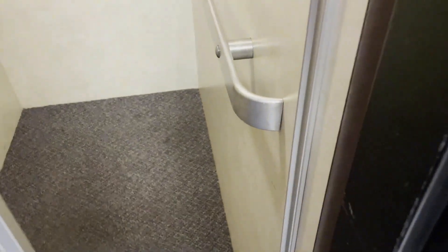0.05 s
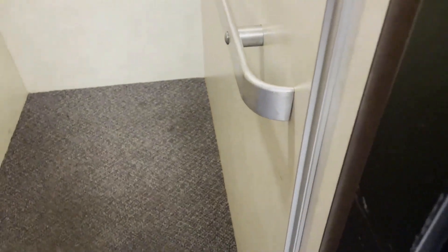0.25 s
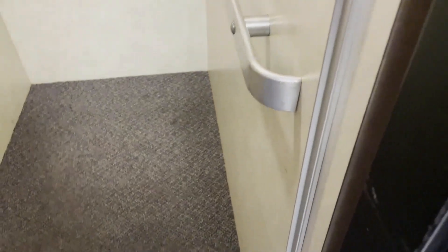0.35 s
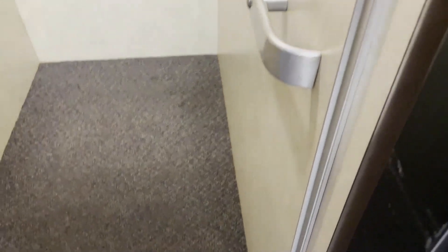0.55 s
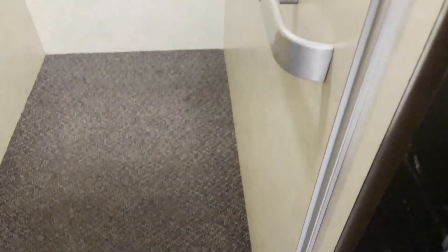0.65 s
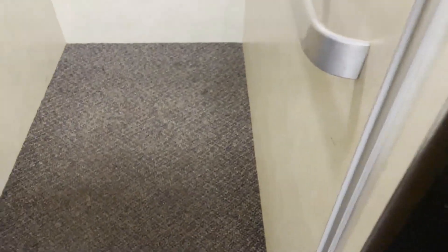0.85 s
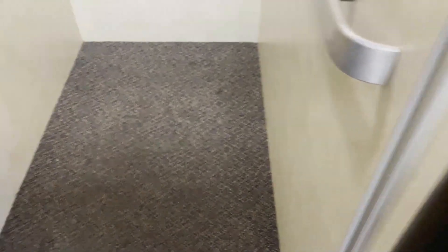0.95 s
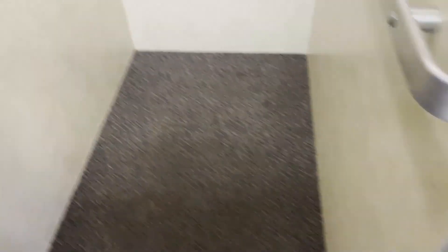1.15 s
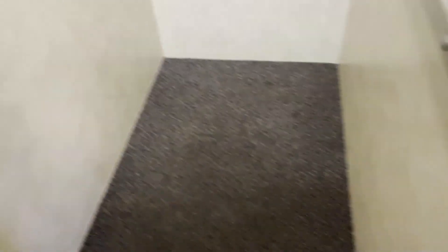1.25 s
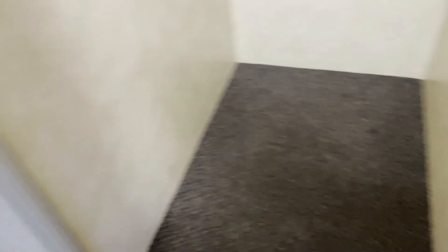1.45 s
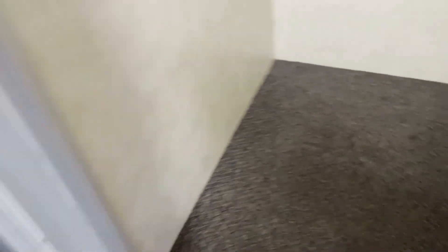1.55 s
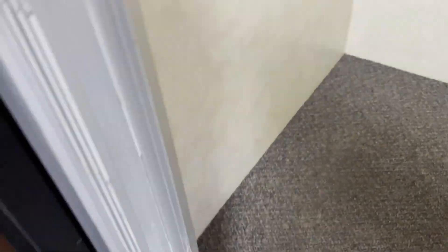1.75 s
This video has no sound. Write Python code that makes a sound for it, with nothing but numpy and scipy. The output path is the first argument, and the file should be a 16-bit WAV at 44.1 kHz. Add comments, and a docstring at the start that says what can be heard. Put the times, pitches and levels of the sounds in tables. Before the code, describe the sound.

A metal lift door slides open close by, scraping and squealing, then bangs against its stop and rattles. Someone steps into the small carpeted car with soft thuds, shoe scuffs and metallic ticks over a low machinery rumble.

```python
"""Lift machinery rumbles and hums throughout. Close by, a metal door slides open, scraping
its track while the rollers sing at a pitch that follows its speed. At 0.5 s it strikes its
stop and rattles: the edge cracks, the sheet clashes, the panel rings and the floor thuds.
From 0.9 s someone steps into the small carpeted car: soft footfalls, ticks from the metal
sill, shoe scuffs and hollow knocks from the car's panels."""
import sys
import numpy as np
from scipy import signal
from scipy.fft import rfft, irfft
from scipy.io import wavfile

SR = 44100
rng = np.random.default_rng(int(sys.argv[2]) if len(sys.argv) > 2 else 0)


def store_pcm(level_fs):
    """Save levels as 16-bit WAV."""
    pcm = np.round(np.clip(level_fs, -1, 1) * 32767).astype(np.int16)
    wavfile.write(sys.argv[1], SR, np.atleast_2d(pcm).T)


N = 79380
T = np.arange(N) / SR
HZ = np.fft.rfftfreq(N, 1 / SR)


def amp(db):
    """Decibels to gain."""
    return 10 ** (np.asarray(db) / 20)


def unit(x):
    """Scales to rms 1."""
    return x / np.sqrt(np.mean(x ** 2) + 1e-20)


def at_hz(table, hz):
    """Interpolates a table on a log-frequency axis."""
    freqs, values = np.transpose(table)
    return np.interp(np.log(hz + 1), np.log(freqs + 1), values)


def curve(table, column=1):
    """Interpolates one column of a table over time."""
    rows = np.array(table)
    return np.interp(T, rows[:, 0], rows[:, column])


def drift(rate_hz):
    """Random wander of rms 1."""
    return unit(irfft(rfft(rng.standard_normal(N)) * np.exp(-(HZ / rate_hz) ** 2), N))


def struck(start_s, rise_s, t60_s):
    """Envelope of a blow: linear rise, exponential fall."""
    age = np.maximum(T - start_s, 0)
    return np.minimum(age / rise_s, 1) * np.exp(-np.log(1000) * age / t60_s)


def resonate(x, hz, width_hz):
    """A resonance that follows the curve hz."""
    carrier = np.exp(2j * np.pi * np.cumsum(hz) / SR)
    pole = np.exp(-np.pi * width_hz / SR)
    return 2 * (carrier * signal.lfilter([1 - pole], [1, -pole], x * carrier.conj())).real


# Microphone pair (frequency [Hz], coherence [0..1])
COHERENCE = [(150, 1), (300, 1), (600, 0.18), (1400, 0.56), (3000, 0.48), (5000, 0.13), (9000, 0.81),
             (13000, 0.99)]
def noise(gain):
    """Stereo noise of rms 1, shaped by gain, alike on both sides in the bass."""
    a, b = rfft(rng.standard_normal((2, N)))
    coherence = at_hz(COHERENCE, HZ)
    mid, side = a * np.sqrt(1 + coherence), b * np.sqrt(1 - coherence)
    return unit(irfft(np.array([mid + side, mid - side]) * gain, N))


def coloured(spectrum):
    """Stereo noise with a tabulated spectrum."""
    return noise(amp(at_hz(spectrum, HZ)))


def tone(hz):
    """Stereo sine of rms 1; lower coherence sets the two phases further apart."""
    spread = np.arccos(at_hz(COHERENCE, np.mean(hz))) * rng.choice([-1, 1])
    phase = 2 * np.pi * (np.cumsum(hz * np.ones(N)) / SR + rng.random())
    return np.sqrt(2) * np.sin(phase + spread * np.array([[.5], [-.5]]))


# Reverberation (frequency [Hz], t60 [s])
LANDING_DECAY = [(150, 0.88), (400, 0.71), (3000, 0.73), (6000, 0.51), (12000, 0.46), (14500, 0.17)]
def landing(x):
    """The hard-walled landing rings on, the treble dying first."""
    hz, t, frames = signal.stft(noise(1), SR, nperseg=256)
    decay = np.exp(-np.log(1000) * t / at_hz(LANDING_DECAY, hz)[:, None])
    tail = signal.istft(frames * decay, SR, nperseg=256)[1][:, :N]
    tail *= np.minimum(T / 0.0039, 1)
    return signal.fftconvolve(x, tail / np.linalg.norm(tail[0]), axes=1)[:, :N]


# Rumble of door and machinery (time [s], level [dB])
RUMBLE_LEVEL = [(0, -36), (.25, -32.5), (.47, -30), (.75, -32.5), (.9, -37), (1.1, -39.5), (1.23, -36.5),
                (1.4, -40), (1.58, -48), (1.72, -40), (1.8, -42.5)]
# Rumble, air noise and hum partials (frequency [Hz], level [dB])
RUMBLE_SPECTRUM = [(15, -40), (30, -19), (43, 3.5), (65, 2.5), (90, 2.5), (120, 2.5), (150, -5), (260, -6),
                   (340, -5), (430, -9.5), (560, -19), (1000, -18), (2000, -26.5), (6000, -55)]
AIR_SPECTRUM = [(100, 25.5), (900, -22), (2000, 6.5), (5000, 4), (7000, -3), (11500, -4), (14000, -32)]
HUM_PARTIALS = [(54, -45), (119, -45), (180, -47.5), (209, -52)]
def machinery(air_db=-57.5, waver_hz=2.466, flutter_db=4):
    """Low rumble, faint air noise and a hum that wavers in pitch and level."""
    out = coloured(RUMBLE_SPECTRUM) * amp(curve(RUMBLE_LEVEL)) + amp(air_db) * coloured(AIR_SPECTRUM)
    for hz, db in HUM_PARTIALS:
        cycles = np.cumsum(hz + waver_hz * drift(rate_hz=6.85)) / SR + rng.random()
        flutter = amp(flutter_db * drift(rate_hz=8.3))
        out += amp(db) * unit(np.sin(2 * np.pi * cycles) * flutter)
    return out


# Scuffs (peak time [s], rise [s], fall [s], level [dB], centre [Hz], glide [octaves/s])
SHOE_SCUFFS = [(0.974, 0.034, 0.019, -41, 3670, -6), (1.024, 0.011, 0.018, -46.5, 2780, -22),
               (1.227, 0.076, 0.053, -39, 1570, -11.5), (1.315, 0.033, 0.12, -43, 1060, -9),
               (1.686, 0.023, 0.046, -47.5, 1670, -37)]
# Sole friction (frequency [Hz], level [dB])
SCUFF_SPECTRUM = [(100, 13), (1000, 5), (5000, 0.5), (7000, -7.5), (11000, -5.5), (13500, -14)]
def scuffs(width_hz=2900):
    """Soles brush the floor: a broad resonance glides down as each scuff swells and fades."""
    out = np.zeros((2, N))
    for peak_s, rise_s, fall_s, db, hz, glide in SHOE_SCUFFS:
        swell = np.exp(-((T - peak_s) / np.where(T < peak_s, rise_s, fall_s)) ** 2 / 2)
        centre_hz = hz * 2 ** (glide * np.clip(T - peak_s, -rise_s, 2 * fall_s))
        rough_gain = amp(db + 1.7 * drift(rate_hz=230))
        out += rough_gain * swell * unit(resonate(coloured(SCUFF_SPECTRUM), centre_hz, width_hz))
    return out


# Sill contacts (time [s], level [dB], pitch [Hz], relative jingle [dB])
SILL_TICKS = [(0.9294, -30.5, 4950, -16), (0.943, -36.5, 4830, -9), (.961, -40.5, 4000, -1),
              (.974, -40.5, 4680, -0.5), (1.011, -48, 3180, -1), (1.1974, -27.5, 3980, -10),
              (1.207, -37, 5520, -6), (1.2956, -23, 4090, -15), (1.3, -28.5, 3980, -12.5),
              (1.304, -32.5, 5570, -11), (1.7423, -48, 4160, -6)]
# Sill modes (frequency [Hz])
SILL_MODES_HZ = [3080, 3246, 3830, 4161, 4245, 4377, 4926, 5572, 5790]
# Contact snap (frequency [Hz], level [dB])
SNAP_SPECTRUM = [(500, -3), (3200, -1.5), (6000, 0), (9500, -11.5), (14000, -25)]
def sill_ticks(rise_s=.0003, width_hz=900):
    """Small metal contacts: a snap with a short ping, then the sill's nearest modes jingle."""
    out = np.zeros((2, N))
    for start_s, db, hz, jingle_db in SILL_TICKS:
        snap = amp(-9.5) * coloured(SNAP_SPECTRUM)
        ping = np.sqrt(2) * np.sin(2 * np.pi * hz * (T - start_s))
        contact = (ping + snap) * struck(start_s, rise_s, t60_s=.011)
        ring = unit(sum(tone(mode) / (1 + ((mode - hz) / width_hz) ** 2) ** 2 for mode in SILL_MODES_HZ))
        hiss = amp(4.5) * snap
        jingle = amp(jingle_db) * (ring + hiss) * struck(start_s, rise_s, t60_s=.12)
        out += amp(db) * (contact + jingle)
    return out


# Car panel knocks (time [s], level [dB], pitch [Hz], pitch wander [Hz], t60 [s])
PANEL_KNOCKS = [(0.511, -27, 178.1, 6.6, 0.38), (0.528, -20, 678, 60, 0.065), (1.176, -34, 482, 150, 0.21),
                (1.207, -29, 197, 10.2, 0.22), (1.307, -31, 925, 69, 0.087)]
def knocks(rise_s=0.0065):
    """The car's hollow panels clunk at an unsteady pitch under the door's blow and the footfalls."""
    return sum(amp(db) * tone(hz + wander_hz * drift(2 * wander_hz)) * struck(start_s, rise_s, t60_s)
               for start_s, db, hz, wander_hz, t60_s in PANEL_KNOCKS)


# Floor thuds (time [s], level [dB], rise [s])
FLOOR_THUDS = [(0.572, -17, 0.04), (0.922, -22.5, 0.018), (1.285, -21.5, .016)]
def thuds(hz=49.6, t60_s=.25):
    """The floor of the car gives a short, deep bounce."""
    return sum(amp(db) * struck(start_s, rise_s, t60_s) * np.sin(2 * np.pi * hz * (T - start_s))
               for start_s, db, rise_s in FLOOR_THUDS)


# Track friction (time [s], level [dB])
SCRAPE_LEVEL = [(0, -42.5), (.05, -42.5), (.08, -37), (.27, -41), (.33, -36.5), (.5, -33), (.54, -64)]
# Track friction (frequency [Hz], level [dB])
SCRAPE_SPECTRUM = [(200, -12), (550, -9), (850, 1), (1700, 0), (2500, -0.5), (3500, 1.5), (5400, 1),
                   (6800, -7), (11000, -13), (13500, -26)]
def track_scrape(grains_per_s=2500, grain_s=0.0003, grit_share=0.24):
    """The door shoe scrapes over grit until the door stops."""
    grains = (rng.random(N) < grains_per_s / SR) * rng.random(N)
    grit = unit(signal.lfilter([1], [1, -np.exp(-1 / (grain_s * SR))], grains))
    scrape = unit(coloured(SCRAPE_SPECTRUM) * (1 - grit_share + grit_share * grit))
    return scrape * amp(curve(SCRAPE_LEVEL)) * (T < SCRAPE_LEVEL[-1][0])


# Roller song (time [s], pitch [Hz], level [dB], boost from the third harmonic up [dB])
ROLLER_SONG = [(.05, 1620, -62, 4), (.134, 1675, -45, 6), (.2, 1815, -39, -5), (.275, 1810, -50, -4),
               (.32, 1880, -42, -5), (.352, 1930, -38, -1), (.378, 1815, -42, -3), (.41, 1745, -39, 1),
               (.435, 1700, -44, 7), (.455, 1655, -44, 9), (.472, 1560, -37, -9), (.51, 1530, -47, -9)]
# Roller partials (pitch multiple [1], level [dB])
ROLLER_PARTIALS = [(.5, -11.5), (1, -5), (2, 2.5), (3, 0.5), (4, -21), (5, -9.5), (6, -14)]
def rollers(stop_s, jitter=.009, halo_width_hz=135, tone_share=.35, flicker_db=3.5):
    """Two rollers sing: whistling partials in a rough halo rise and fall with the door's speed."""
    pitch_hz, level_db, boost_db = (curve(ROLLER_SONG, column) for column in (1, 2, 3))
    out = np.zeros((2, N))
    for detune, roller_db in [(1, 0), (.92, -9)]:
        roller_hz = pitch_hz * detune * (1 + jitter * drift(rate_hz=150))
        rub = noise(1)
        for multiple, partial_db in ROLLER_PARTIALS:
            hz = multiple * roller_hz
            halo = unit(resonate(resonate(rub, hz, halo_width_hz), hz, 5 * halo_width_hz))
            voice = np.sqrt(tone_share) * tone(hz) + np.sqrt(1 - tone_share) * halo
            flicker = amp(flicker_db * np.tanh(drift(rate_hz=74)))
            out += amp(roller_db + partial_db + boost_db * (multiple >= 3)) * unit(voice * flicker)
    fade = np.clip((stop_s - T) / 0.015, 0, 1)
    return out * amp(level_db) * fade


def sizzle(start_s, centre_hz=10400, half_width_hz=3600):
    """A short, bright buzz of the door's metal sheet."""
    buzz = noise(1 / (1 + ((HZ - centre_hz) / half_width_hz) ** 2))
    return amp(-21) * buzz * struck(start_s, rise_s=0.0074, t60_s=0.17)


# Door against its stop (time [s], edge level [dB], panel level [dB])
DOOR_BLOWS = [(0.5015, -24.5, -59), (0.5093, -17.5, -24.5), (0.5162, -14.5, -19), (0.531, -20, -15.5),
              (0.543, -19.5, -36), (0.588, -23.5, -27.5), (0.7207, -43, -37.5), (0.7552, -41, -46)]
# Edge clash, panel noise and door modes (frequency [Hz], level [dB])
CLASH_SPECTRUM = [(200, -21), (900, -4.5), (2500, -0.5), (4100, 4.5), (5000, 0.5), (6200, 0.5),
                  (7000, -17.5), (9000, -11.5), (12000, -16.5), (14000, -31)]
PANEL_SPECTRUM = [(60, -14), (130, -2), (190, -28), (280, 5.5), (400, -1), (540, -3), (800, 2.5),
                  (1000, 3.5), (1270, 5), (1550, -15), (2500, -2), (6000, -44)]
DOOR_MODES = [(181, -8.5), (263.7, -8.5), (307, -14), (640, -8), (788, -6), (886, -7.5), (960, -9),
              (1044, -16), (1245, -16), (1286, -5.5), (2238, -18), (2536, -10), (2956, -16), (3541, -21),
              (4066, -20), (4287, -29), (6183, -20)]
def door_clatter(panel_rise_s=0.015, modes_db=-3, rattle_db=3, waver_hz=7.58):
    """Each blow cracks at the door's edge, sets the sheet clashing and rings the panel's modes."""
    clash_power, panel_power, ring_power = np.zeros((3, N))
    for start_s, edge_db, panel_db in DOOR_BLOWS:
        crack = amp(7.5) * struck(start_s, rise_s=0.00027, t60_s=0.047)
        clash = struck(start_s, rise_s=0.0013, t60_s=0.22)
        clash_power += amp(edge_db) ** 2 * (crack ** 2 + clash ** 2) / 2
        panel_power += (amp(panel_db) * struck(start_s, panel_rise_s, t60_s=0.24)) ** 2
        ring_power += (amp(panel_db) * struck(start_s, panel_rise_s, t60_s=0.17)) ** 2
    out = np.sqrt(clash_power) * coloured(CLASH_SPECTRUM)
    out += np.sqrt(panel_power) * coloured(PANEL_SPECTRUM)
    for hz, db in DOOR_MODES:
        rattle = amp(rattle_db * np.tanh(drift(rate_hz=60)))
        mode = tone(hz + waver_hz * drift(rate_hz=27))
        out += amp(modes_db + db) * np.sqrt(ring_power) * rattle * mode
    return out


def scene():
    """Door and steps echo on the landing; floor thuds and machinery stay dry."""
    hardest_blow_s = DOOR_BLOWS[2][0]
    song = rollers(stop_s=hardest_blow_s)
    contacts = track_scrape() + door_clatter() + sizzle(hardest_blow_s)
    contacts += sill_ticks() + knocks() + scuffs()
    reverb = landing(amp(-13) * song + amp(-12) * contacts)
    return song + contacts + reverb + thuds() + machinery()


# Microphone balance (frequency [Hz], left minus right [dB])
MIC_BALANCE = [(60, 0), (200, 2.16), (380, 3.5), (700, 0), (1300, -0.5), (2400, .5), (4400, 1),
               (8000, -0.5)]
def record(dry, notch_hz=7738, lead_s=0.000187, lead_from_hz=4520, cutoff_hz=15900):
    """A narrow band near 7.7 kHz is missing, the top rolls off and the two sides differ in colour."""
    notch_db = -28.5 * np.exp(-((HZ - notch_hz) / 512) ** 4)
    rolloff_db = -3 * np.maximum(HZ - 12600, 0) / 1000
    sides = np.array([[.5], [-.5]])
    # Treble reaches the left microphone first
    lead_rad = 2 * np.pi * HZ * lead_s * (.5 + .5 * np.tanh((HZ - lead_from_hz) / 500))
    gain = amp(notch_db + rolloff_db + at_hz(MIC_BALANCE, HZ) * sides)
    heard = irfft(rfft(dry) * gain * np.exp(1j * lead_rad * sides), N)
    lowpass = signal.firwin(511, cutoff_hz, window=("kaiser", 9), fs=SR)
    return signal.oaconvolve(heard, lowpass[None], "same")


dry = scene()
out = record(dry)
store_pcm(out)
```